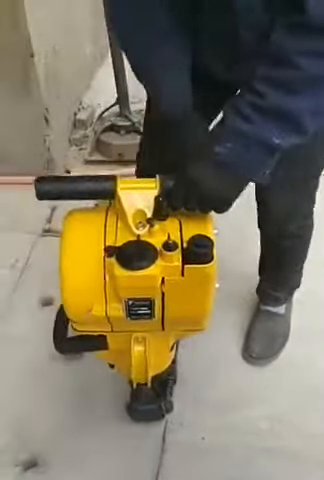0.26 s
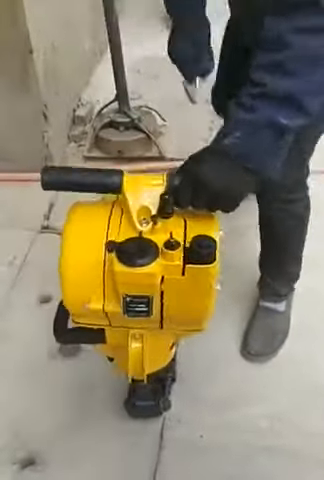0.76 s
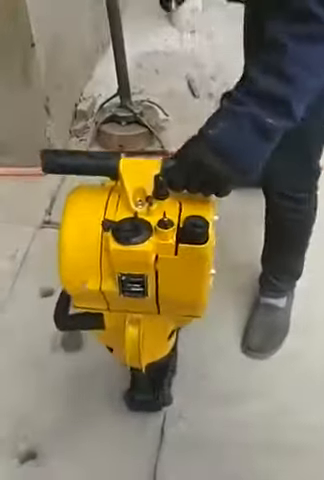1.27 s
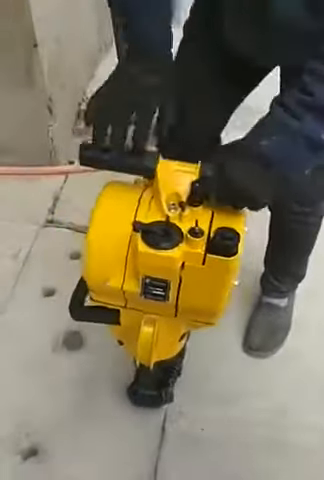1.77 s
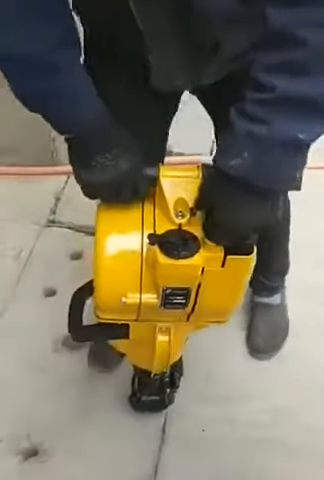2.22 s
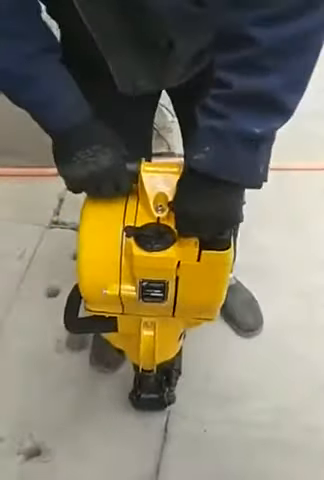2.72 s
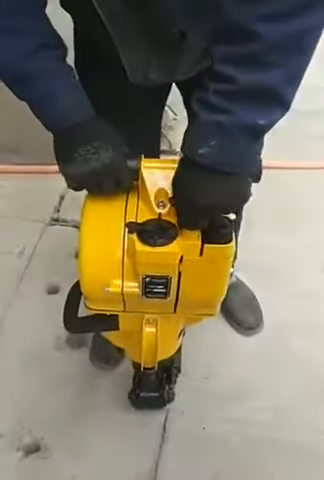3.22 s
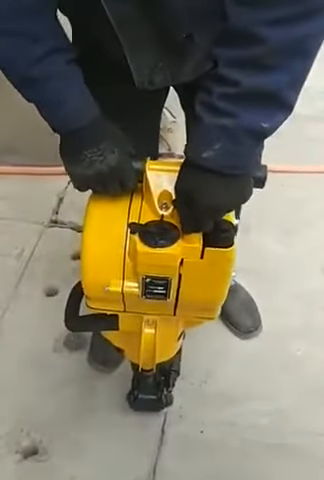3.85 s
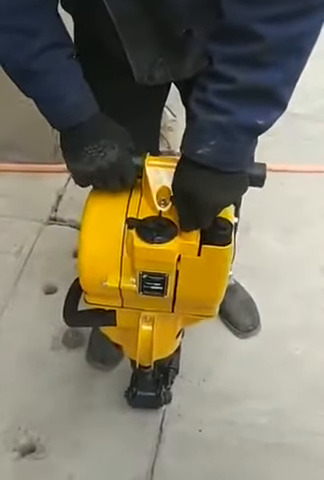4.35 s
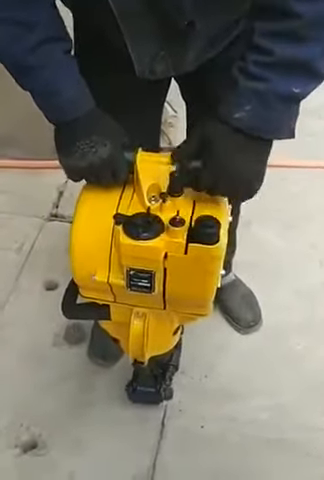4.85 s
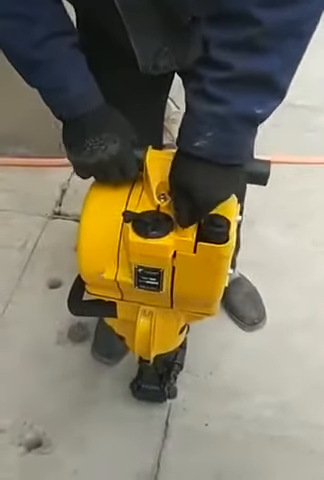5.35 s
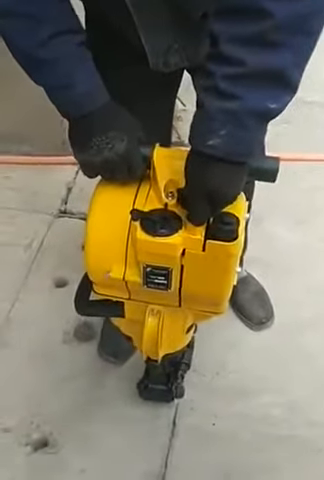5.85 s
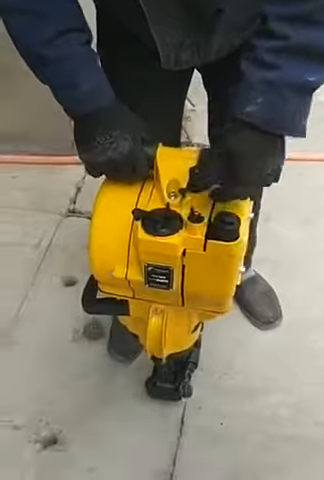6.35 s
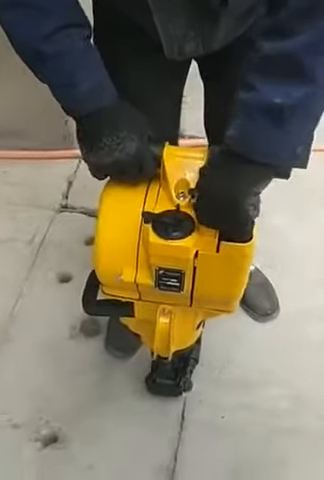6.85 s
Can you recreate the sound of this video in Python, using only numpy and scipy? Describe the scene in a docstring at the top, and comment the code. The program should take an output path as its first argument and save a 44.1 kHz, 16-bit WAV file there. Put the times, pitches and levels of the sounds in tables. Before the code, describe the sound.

Close to a petrol rock drill on a concrete workshop floor, faint far machines hum and whine. A small click and lever clack come first, then hollow pops as the engine catches. It stumbles with irregular coughs and hard metallic knocks, settles into separate barks about nine per second, and climbs to sixteen, with low boom and steel clatter. Nearby walls reflect briefly; the treble is dull and slightly hollow.

```python
"""Far machines hum and whine across a workshop; a latch clicks beside a two-stroke petrol rock drill on concrete.
The engine catches with hollow pops, stumbles and knocks, then gathers speed to about sixteen firings a second.
Each turn gives an exhaust bark (a repeated pressure wave and a noise jet) and booms in silencer and air box.
Free hammer piston and casing clatter as showers of small impacts through steel modes; floor and walls reflect."""
import sys
import numpy as np
from scipy import signal
from scipy.fft import rfft, irfft
from scipy.io import wavfile
from scipy.ndimage import uniform_filter1d

SR = 44100
rng = np.random.default_rng(int(sys.argv[2]) if len(sys.argv) > 2 else 0)


def store_pcm(level_fs):
    """Save levels as 16-bit WAV."""
    pcm = np.round(np.clip(level_fs, -1, 1) * 32767).astype(np.int16)
    wavfile.write(sys.argv[1], SR, np.atleast_2d(pcm).T)


N = 312228
TIME = np.arange(N) / SR   # s
CUTOFF_HZ = 7550           # top of the heard band
FULL_SPEED = 16            # turns per s

# The cold engine's first firings. Each row: time in seconds, relative bark level in dB.
FIRST_STUMBLES = [(0.802, -19), (0.912, -12), (0.975, -20), (1.095, -24.5), (1.226, -15), (1.349, -15),
                  (1.473, -15.5), (1.586, -28), (1.661, -19)]
# Crank speed once it runs on. Each row: time in seconds, speed in turns per second.
CRANK_SPEED = [(1.78, 8.87), (2.17, 10.9), (2.26, 9.58), (2.47, 11.71), (2.64, 10.62), (3.33, 13.48),
               (4.03, 13.56), (4.95, 15.88), (5.2, 15.03), (5.3, 16.09), (6.46, 15.75), (6.55, 16.64),
               (6.98, 15.09)]
# Force of the combustion. Each row: time in seconds, relative bark level in dB.
COMBUSTION_EFFORT = [(1.95, -18), (2.25, -20), (2.6, -11.5), (3.1, -19), (3.45, -15.5), (3.95, -15),
                     (4.4, -14.5), (4.85, -15), (5.3, -12.5), (5.65, -17), (7.0, -15)]
# Single firings, some stronger, weaker or left as usual. Each row: time in seconds, change in dB
# against the usual bark.
SINGLE_FIRINGS = [(1.78, -4), (1.99, 3.5), (2.09, 1.5), (2.38, -0.5), (2.47, -7), (2.56, -1.5), (2.92, 0),
                  (3.0, -16.5), (3.39, 1.5), (3.69, 1.5), (3.76, -6), (4.05, 1.5), (4.34, 2.5), (4.54, 2),
                  (4.61, -5), (4.87, -3.5), (4.94, 2.5), (5.0, 0), (5.19, 0), (5.26, 0), (5.38, 0),
                  (5.45, 3), (5.7, 4.5), (5.88, 3), (5.95, -1.5), (6.01, -11), (6.7, 4), (6.95, -29),
                  (7.02, 5)]


def firings():
    """Times and bark levels of all firings: the first stumbles, then one for each full turn of the crank."""
    running = np.arange(CRANK_SPEED[0][0], N / SR, 1 / SR)
    turned = np.cumsum(along(CRANK_SPEED, running)) / SR
    fired = np.interp(np.arange(turned[-1]), turned, running)
    bark_db = along(COMBUSTION_EFFORT, fired)
    for s, change_db in SINGLE_FIRINGS:
        bark_db[np.argmin(abs(fired - s))] += change_db
    return np.hstack([np.transpose(FIRST_STUMBLES), [fired, bark_db]])


# Colour of the exhaust bark. Each row: frequency in Hz, relative spectral level in dB per Hz.
BARK_COLOUR = [(100, -62.5), (260, 9.5), (400, -8.5), (560, 4.5), (760, 2), (850, -1), (940, 1), (1040, 1),
               (1160, -9.5), (1400, 0.5), (1620, -11), (1820, -1), (2300, -13), (4200, -9.5), (7400, -43)]
PULSE_DB, BLOWBY_DB = -3.5, -5.5   # pressure wave and early leak against the bark


def exhaust(fired, bark_db, length_s=0.0079, jet_db=-4.0):
    """Each firing sends the same pressure wave, smeared by the baffles, and a fresh turbulent jet."""
    lag = np.arange(-SR // 20, SR // 20) / SR
    shape = np.exp(-(lag / length_s) ** 2)
    wave = rng.standard_normal(len(lag))
    for _ in range(10):   # the baffles spread the wave in time but leave its spectrum flat
        phase = np.angle(rfft(wave * shape))
        wave = irfft(np.exp(1j * phase), len(lag)) * np.linalg.norm(shape)
    opened = crank(fired, turns=0, jitter_s=.0006)
    pulses = np.zeros(N)
    for s, db in zip(opened, bark_db):
        add(pulses, s + lag[0], from_db(db + PULSE_DB) * wave)
    jet = swells(opened, bark_db + jet_db, rise_s=.0025, fall_s=.005)

    # gas already leaks out as the port starts to open, the more so at speed
    blowby_db = BLOWBY_DB + by_speed(fired, full_db=0, doubling_db=3, scatter_db=.5)
    leaking = crank(fired, turns=-0.046, jitter_s=0.0018)
    blowby = swells(leaking, bark_db + blowby_db, rise_s=0.022, fall_s=0.0032)

    turbulence = rng.standard_normal(N)
    turbulence = flicker(turbulence, depth_db=11.0, patch_hz=50, patch_s=0.0094, above_hz=2200)
    turbulence = evened(turbulence, 450, 2000)
    return colour(pulses + np.hypot(jet, blowby) * turbulence, BARK_COLOUR)


# Gas pulses in the silencer within one turn. Each row: turns after the firing, relative level in dB at
# full speed, change in dB per doubling of speed, direction (push 1 or suction -1).
SILENCER_PUFFS = [(.015, -22.5, -0.5, 1), (.184, -27.5, -4, 1), (0.9, -31, -7.5, 1)]
# Gulps of the intake at the air box. Each row: the same four columns in the same units.
INTAKE_GULPS = [(0.513, -20, 1, -1), (0.688, -32.5, -14, -1)]
# Colour of the silencer cavity. Each row: frequency in Hz, relative spectral level in dB per Hz.
SILENCER_COLOUR = [(40, -71), (95, -30), (130, -18), (170, -4.5), (190, 0), (210, 5.5), (243, 2.5),
                   (275, -2.5), (305, 0.5), (350, -9), (600, -23.5), (2000, -47.5)]
# Colour of the air box cavity. Each row: frequency in Hz, relative spectral level in dB per Hz.
AIR_BOX_COLOUR = [(40, -66.5), (95, -39.5), (135, -21), (172, -10.5), (196, -2), (214, 3.5), (238, -3.5),
                  (268, -11.5), (330, -13.5), (600, -46.5), (2000, -76.5)]
# Strength of the boom in both cavities. Each row: time in seconds, level change in dB.
BOOM_STRENGTH = [(1.2, -3), (2.5, -0.4), (3.3, 0.5), (4.3, 1), (5.3, -0.6), (7.0, 0.1)]


def booming(fired, puffs, cavity, puff_db=27.5, gas_db=-32):
    """Puffs set a cavity's air booming, alike from turn to turn, with a little rushing gas behind each."""
    pushes, gas = np.zeros(N), np.zeros(N)
    for turns, db, doubling_db, direction in puffs:
        times = crank(fired, turns, jitter_s=.0004)
        levels_db = by_speed(fired, db + puff_db, doubling_db, scatter_db=0.44)
        levels_db += along(BOOM_STRENGTH, fired)
        for s, level_db in zip(times, levels_db):
            add(pushes, s, np.sign(direction) * from_db([level_db]))
        gas += swells(times, levels_db + gas_db, rise_s=.006, fall_s=.007)
    return colour(pushes + gas * rng.standard_normal(N), cavity)


# Piston, chuck and gear contacts within one turn. Each row: turns after the firing, relative level in dB at
# full speed, change in dB per doubling of speed, rise in seconds, fall in seconds, lowest frequency in Hz.
CONTACTS = [(0.04, -17.5, 11, 0.0025, 0.0085, 400), (.33, -26, -9.5, .003, .011, 1500),
            (0.45, -22.5, -6.5, 0.0018, .011, 1190), (0.6, -21, -2, 0.0025, .012, 553),
            (.75, -28.5, 10, .002, 0.0079, 452), (.85, -22, 18, 0.0033, 0.013, 454),
            (.94, -20, 2, .0018, 0.009, 622)]
# Hard knocks of steel and the sharp cracks that open some barks. Each row: time in seconds,
# relative level in dB, fall in seconds.
KNOCKS_AND_CRACKS = [(0.779, -8.5, 0.015), (0.803, -6.5, 0.0028), (0.835, -8.5, 0.02), (0.87, -12, 0.027),
                     (0.931, -11, 0.0041), (0.968, -9, 0.016), (1.016, -17.5, .004), (1.041, -6.5, 0.0032),
                     (1.073, -12, 0.005), (1.09, -5.5, 0.0086), (1.13, -12, 0.024), (1.227, -16, 0.0015),
                     (1.261, -12, 0.0088), (1.324, -16, 0.0081), (1.448, -7.5, 0.011), (1.633, -11, 0.01),
                     (1.719, -12, 0.006), (1.758, -6.5, 0.013), (1.809, -9, 0.0042), (2.045, -13, 0.0054),
                     (2.09, -11.5, 0.0055), (2.379, -3.5, 0.0033), (2.412, -16, 0.01), (2.518, -10, 0.0025),
                     (2.553, -6, 0.0028), (2.795, -11, 0.0073), (2.997, -3.5, 0.0018), (3.049, -9, 0.0064),
                     (3.081, -5.5, 0.005), (3.131, -10, 0.0032), (3.163, -11, 0.018), (3.31, -17.5, .005),
                     (3.388, -19, 0.0038), (3.459, -13, 0.0029), (3.683, -12, 0.0036),
                     (3.979, -8.5, 0.0036), (4.122, -12.5, 0.005), (4.408, -7.5, 0.0023),
                     (4.466, -5, 0.0073), (5.068, -8, 0.0021), (5.189, -10.5, 0.0068), (5.444, -13.5, .005),
                     (6.015, -15, 0.0028)]
# Colour of the struck steel. Each row: frequency in Hz, relative spectral level in dB per Hz.
STEEL_COLOUR = [(60, -52.5), (180, -13.5), (500, 6), (760, 4.5), (1150, 1), (1400, 2), (1620, -0.5),
                (1800, -7), (2080, -8), (2300, -2), (2600, -2.5), (2900, 0.5), (3750, -4), (4300, -3),
                (5000, -4), (6000, -10), (7400, -7.5)]
# Modes of the steel casing. Each row: frequency in Hz, width in Hz, relative level in dB.
CASING_MODES = [(749, 56, -17), (908, 41, -19.5), (1407, 170, -24), (1789, 110, -11), (2007, 98, -15.5),
                (2870, 95, -25), (3410, 77, -27), (4180, 170, -27.5)]


def hammer(fired, knock_db=-7.0, knock_cut_hz=600):
    """Piston, gears and chuck strike in showers of impacts; these, knocks and cracks ring in the casing."""
    shower = evened(steel_noise() * rattle(), 500, 5500)
    churn_db = by_speed(fired, full_db=-26.0, doubling_db=-5.0, scatter_db=0.5)
    impacts = swells(fired, churn_db, rise_s=.04, fall_s=.045) * shower
    for turns, db, doubling_db, rise_s, fall_s, low_hz in CONTACTS:
        times = crank(fired, turns, jitter_s=0.00048)
        levels_db = by_speed(fired, db, doubling_db, scatter_db=1.73)
        own_shower = low_cut(np.roll(shower, rng.integers(N)), low_hz)
        impacts += swells(times, levels_db, rise_s, fall_s) * own_shower
    impacts *= free_flight(fired)

    sharp = np.zeros(N)   # envelope of the knocks and cracks
    for s, db, fall_s in KNOCKS_AND_CRACKS:
        sharp += swells([s], [db + knock_db], rise_s=0.0013, fall_s=fall_s)
    impacts = brightened(impacts + sharp * low_cut(steel_noise(), knock_cut_hz))

    clatter = colour(impacts, STEEL_COLOUR)
    for hz, width_hz, db in CASING_MODES:
        clatter += from_db(db) * resonance(impacts, hz, width_hz)
    return clatter


# Single impacts within a shower: rate, fall, spread of level, share of power that is diffuse
RATTLE_PER_S, RATTLE_FALL_S, RATTLE_SPREAD_DB, RATTLE_BLUR = 260, .002, 2.5, .5


def rattle():
    """Envelope of many small impacts, each striking at once and dying within milliseconds; rms 1."""
    spread = np.clip(rng.standard_normal(N), -2, 2)
    struck = (rng.random(N) < RATTLE_PER_S / SR) * from_db(RATTLE_SPREAD_DB * spread) ** 2
    power = signal.lfilter([1], [1, -np.exp(-2 / (RATTLE_FALL_S * SR))], struck + 1e-18)
    return np.sqrt(RATTLE_BLUR + (1 - RATTLE_BLUR) * power / power.mean())


def steel_noise():
    """No two blows excite the same modes equally: single partials stand out for a moment; rms 1."""
    noise = rng.standard_normal(N)
    return rms_one(flicker(noise, depth_db=16.0, patch_hz=32.3, patch_s=0.0059, above_hz=1050))


def free_flight(fired, after_s=0.019, length_s=0.0085, depth_db=-3.5):
    """Gain that sinks shortly after each firing, while the piston flies freely and nothing touches."""
    lag, flying = np.arange(-SR // 20, SR // 20) / SR, np.zeros(N)
    for s in fired + after_s:
        add(flying, s + lag[0], np.exp(-(lag / length_s) ** 4))
    return from_db(depth_db * flying)


def brightened(x, doubling_db=4, above_hz=3600, even_turns_per_s=13):
    """The faster the crank, the harder the contacts and the more treble they carry."""
    highpass = signal.butter(2, above_hz, "high", fs=SR, output="sos")
    treble = signal.sosfiltfilt(highpass, x)
    doublings = np.log2(along(CRANK_SPEED, TIME) / even_turns_per_s)
    return x + (from_db(doubling_db * doublings) - 1) * treble


# Hollow pops as the engine catches. Each row: time in seconds, level in dB over the pipe modes,
# lowest frequency in Hz.
CATCHING_POPS = [(.631, 6.5, 700), (.675, 3.5, 197), (.692, -2.5, 201)]
# Modes of the exhaust pipe. Each row: frequency in Hz, width in Hz, relative level in dB.
PIPE_MODES = [(214, 16, -20), (329, 19, -14.5), (391, 30, -11.5), (615, 35, -15), (720, 35, -16),
              (825, 35, -18), (1550, 30, -27)]


def pops():
    """The first weak firings are hollow pops that ring in the exhaust pipe."""
    out = np.zeros(N)
    for s, db, low_hz in CATCHING_POPS:
        out += from_db(db) * low_cut(ringing(s, PIPE_MODES, rise_s=0.0035), low_hz)
    return out


# Clicks and rushes of gas while starting. Each row: time in seconds, level in dB, rise in seconds,
# fall in seconds, lowest frequency in Hz, highest frequency in Hz.
STARTING_BURSTS = [(0.335, -17.5, 0.001, 0.004, 3500, 8100), (.352, -31, 0.015, 0.015, 1465, 4900),
                   (0.392, -22.5, 0.002, 0.0073, 503, 1410), (0.631, -14.5, 0.0069, 0.012, 510, 1124),
                   (0.634, -21.5, 0.01, 0.016, 1310, 3300), (0.682, -16.5, 0.0046, 0.023, 397, 930),
                   (.692, -24, 0.0038, .012, 1050, 1950), (0.759, -17.5, 0.058, 0.021, 178, 244),
                   (0.783, -19, 0.055, 0.011, 595, 6260), (1.541, -19, 0.001, 0.017, 5200, 8430)]


def starting():
    """Clicks, muffled thuds and rushes of gas while starting: bursts of noise, each in its own band."""
    out = np.zeros(N)
    for s, db, rise_s, fall_s, low_hz, high_hz in STARTING_BURSTS:
        band = signal.butter(2, [low_hz, high_hz], "band", fs=SR, output="sos")
        noise = rng.standard_normal(N)
        burst = signal.sosfilt(band, (swells([s], [db], rise_s, fall_s) + 1e-12) * noise)
        out += burst * np.sqrt(SR / 2 / (high_hz - low_hz))   # a narrow band is as strong as a wide one
    return low_cut(out, 160)


# Modes of the control lever. Each row: frequency in Hz, width in Hz, level in dB.
LEVER_MODES = [(345, 12, -31), (572, 20, -30)]


def lever():
    """A control lever hits its stop, which leaves two low modes ringing."""
    return ringing(.389, LEVER_MODES, rise_s=.002)


ROOM_DB, ROOM_T60_S = -10.5, .35   # reflections against the drill; time to fall by 60 dB


def room(x, first_echo_s=.008, sway_hz=1.7):
    """Dense reflections off floor and walls; their pattern shifts as the drill rocks about."""
    lag, out = TIME[:SR // 2], np.zeros(N)
    sway = 2 * np.pi * sway_hz * TIME
    for weight in (np.cos(sway), np.sin(sway)):
        tail = rng.standard_normal(len(lag)) * from_db(-60 * lag / ROOM_T60_S) * (lag > first_echo_s)
        out += signal.fftconvolve(x * weight, tail / np.linalg.norm(tail))[:N]
    return out


# Steady hum of the far machines. Each row: frequency in Hz, rms level in dB.
FAR_HUM = [(279.9, -53), (419.9, -52), (1082, -54), (2425, -51), (2622, -59.5), (2840, -50.5),
           (3058, -62.5)]
# Whine of a far motor. Each row: time in seconds, frequency in Hz, rms level in dB.
MOTOR_WHINE = [(0, 2322, -48), (.14, 2320, -48), (.17, 2330, -66), (.24, 2728, -66), (.3, 2728, -52),
               (.45, 2726, -47), (.6, 2722, -47), (.9, 2722, -54)]
# Colour of the far wash of noise. Each row: frequency in Hz, relative spectral level in dB per Hz.
WASH_COLOUR = [(60, -39), (130, -28), (210, 0.5), (400, -3.5), (580, -4), (850, -3.5), (1300, -6.5),
               (1700, -7.5), (2350, -8), (2900, -3.5), (3400, -7.5), (4300, -8.5), (6000, -12), (7400, -12)]
WASH_DB = -37.5


def workshop(waver_hz=.7):
    """Far machines: a wash of noise, a hum and a motor's slightly wavering whine."""
    s, hz, db = np.transpose(MOTOR_WHINE)
    waver = np.sqrt(2 * np.pi * waver_hz / SR) * rng.standard_normal(N)   # random walk of the phase
    phase = np.cumsum(2 * np.pi * np.interp(TIME, s, hz) / SR + waver)
    whine = from_db(np.interp(TIME, s, db)) * np.sin(phase)
    hum = sum(from_db(level_db) * np.sin(2 * np.pi * hum_hz * TIME) for hum_hz, level_db in FAR_HUM)
    wash = flicker(rng.standard_normal(N), depth_db=4, patch_hz=40, patch_s=0.011, above_hz=3800)
    return from_db(WASH_DB) * colour(wash, WASH_COLOUR) + np.sqrt(2) * (whine + hum)


def crank(fired, turns, jitter_s):
    """The moments at which the crank stands so many turns after each firing, with some jitter."""
    return fired + turns * periods(fired) + jitter_s * rng.standard_normal(len(fired))


def periods(fired):
    """Length of the turn that follows each firing; the last repeats the one before."""
    return np.append(np.diff(fired), fired[-1] - fired[-2])


def by_speed(fired, full_db, doubling_db, scatter_db):
    """A level for each turn: it follows the crank speed, with some scatter."""
    halvings = np.log2(periods(fired) * FULL_SPEED)
    return full_db - doubling_db * halvings + scatter_db * rng.standard_normal(len(fired))


def along(curve, s):
    """Value of a curve at the times s."""
    return np.interp(s, *np.transpose(curve))


def from_db(db):
    """Amplitude factor of a level in dB."""
    return 10 ** (np.asarray(db) / 20)


def rms_one(x):
    """Scales a signal to rms 1."""
    return x / np.sqrt(np.mean(x ** 2) + 1e-20)


def add(out, s, piece):
    """Mixes a piece into out from time s on."""
    start = int(round(s * SR))
    low, high = max(start, 0), min(start + len(piece), N)
    if high > low:
        out[low:high] += piece[low - start:high - start]


def swells(times, levels_db, rise_s, fall_s):
    """Envelope of bursts that swell to each time and die away; they add in power."""
    lag, power = np.arange(-SR // 4, SR // 4) / SR, np.zeros(N)
    shape = np.exp(-2 * np.maximum(-lag / rise_s, lag / fall_s))
    for s, db in zip(times, levels_db):
        add(power, s + lag[0], from_db(db) ** 2 * shape)
    return np.sqrt(power)


def colour(x, spectrum, size=8192):
    """Causal (minimum-phase) filter; white noise keeps its power, counted below the cutoff."""
    hz, db = np.transpose(spectrum)
    bins = np.maximum(np.arange(size // 2 + 1) * SR / size, 1)
    gain = from_db(np.interp(np.log(bins), np.log(hz), db))
    gain = gain / np.sqrt(np.mean(gain ** 2 * (bins < CUTOFF_HZ)))
    cepstrum = irfft(np.log(gain))[:size // 2]
    cepstrum[1:] *= 2   # folded onto positive time: minimum phase
    return signal.fftconvolve(x, irfft(np.exp(rfft(cepstrum, size))))[:N]


def resonance(x, hz, width_hz):
    """One mode driven by a signal; white noise keeps its power."""
    r = np.exp(-np.pi * width_hz / SR)
    feed = np.sqrt((1 - r * r) / 2) * np.array([1, 0, -1])
    return signal.lfilter(feed, [1, -2 * r * np.cos(2 * np.pi * hz / SR), r * r], x + 1e-18)


def ringing(s, modes, rise_s):
    """Modes that swell from time s and die away, each from a random phase."""
    lag, rings = np.maximum(TIME - s, 0), np.zeros(N)
    for hz, width_hz, db in modes:
        decay = np.exp(-np.pi * width_hz * lag)
        rings += from_db(db) * decay * np.sin(2 * np.pi * (hz * lag + rng.random()))
    return rings * (1 - np.exp(-(lag / rise_s) ** 2))


def low_cut(x, hz):
    """Takes away what lies below a pitch."""
    return signal.sosfilt(signal.butter(2, hz, "high", fs=SR, output="sos"), x)


def evened(x, low_hz, high_hz, window_s=.011):
    """Holds the strength of a noise steady within a band, so that only its fine grain varies."""
    heard = signal.sosfilt(signal.butter(2, [low_hz, high_hz], "band", fs=SR, output="sos"), x)
    power = uniform_filter1d(rms_one(heard) ** 2, int(window_s * SR))
    return x / np.sqrt(np.maximum(power, 1e-3))


def flicker(x, depth_db, patch_hz, patch_s, above_hz=300, size=1024):
    """Colour keeps changing, mostly above a pitch: neighbouring frequencies swell and fade together."""
    hz, s, frames = signal.stft(x, SR, nperseg=size, noverlap=size * 3 // 4)
    chance = rng.standard_normal(frames.shape)
    for axis, spread in enumerate([patch_hz / hz[1], patch_s / s[1]]):
        bell = np.exp(-.5 * (np.arange(-16, 17) / spread) ** 2)
        chance = signal.fftconvolve(chance, np.expand_dims(bell, 1 - axis), mode="same")
    reach = (hz ** 2 / (hz ** 2 + above_hz ** 2))[:, None]
    gain = from_db(depth_db * reach * np.minimum(rms_one(chance), 1))
    gain /= np.sqrt(np.mean(gain ** 2, axis=1, keepdims=True))   # every frequency keeps its mean power
    return signal.istft(frames * gain, SR, nperseg=size, noverlap=size * 3 // 4)[1][:N]


def spectral_expander(x, threshold_db=-4.6, slope=2.6, deepest_db=15, above_hz=800, memory_s=.07, size=1024):
    """Whatever sinks below the recent level of its neighbourhood sinks further, so the sound turns hollow."""
    hz, s, frames = signal.stft(x, SR, nperseg=size, noverlap=size * 3 // 4)
    power = uniform_filter1d(uniform_filter1d(abs(frames) ** 2, size=3, axis=0), size=5, axis=1)
    keep = np.exp(-s[1] / memory_s)
    usual = signal.lfilter([1 - keep], [1, -keep], uniform_filter1d(power, size=17, axis=0))
    under_db = threshold_db - 10 * np.log10((abs(power) + 1e-18) / (abs(usual) + 1e-18))
    reach = (hz ** 2 / (hz ** 2 + above_hz ** 2))[:, None]
    cut_db = np.clip(slope * under_db, 0, deepest_db) * reach
    return signal.istft(frames * from_db(-cut_db), SR, nperseg=size, noverlap=size * 3 // 4)[1][:N]


def scene():
    """One train of firings drives exhaust, silencer, air box and hammer; the workshop answers and hums behind."""
    fired, bark_db = firings()
    start_up = low_cut(starting() + pops() + lever(), 140)
    clatter = exhaust(fired, bark_db) + hammer(fired) + start_up
    boom = booming(fired, SILENCER_PUFFS, SILENCER_COLOUR) + booming(fired, INTAKE_GULPS, AIR_BOX_COLOUR)
    drill = clatter + boom + from_db(ROOM_DB) * room(clatter + .5 * boom)
    # whole groups of partials swell or stay quiet for a moment
    drill = flicker(drill, depth_db=2.5, patch_hz=101, patch_s=0.0087, above_hz=1260)
    return (drill + workshop())[None]


def record(dry, top=0.8):
    """Weak patches of the spectrum sink further, peaks are rounded and the treble is cut steeply."""
    rounded = top * np.tanh(spectral_expander(dry[0]) / top)
    lowpass = signal.firwin(1001, CUTOFF_HZ, fs=SR, window=("kaiser", 7))
    return signal.fftconvolve(rounded, lowpass, mode="same")[None]


dry = scene()
out = record(dry)
store_pcm(out)
```